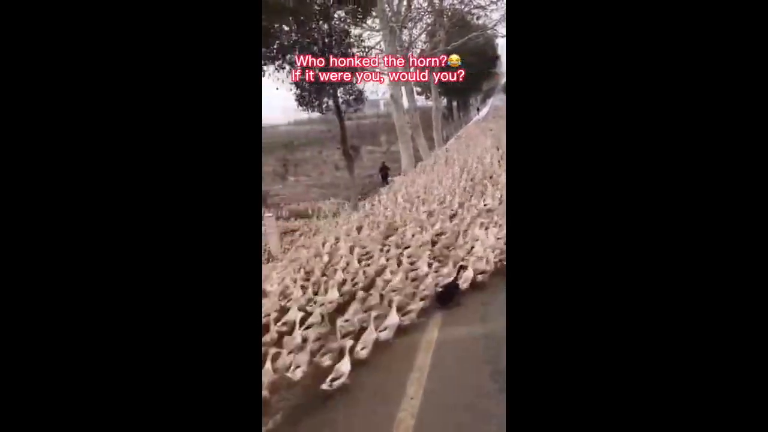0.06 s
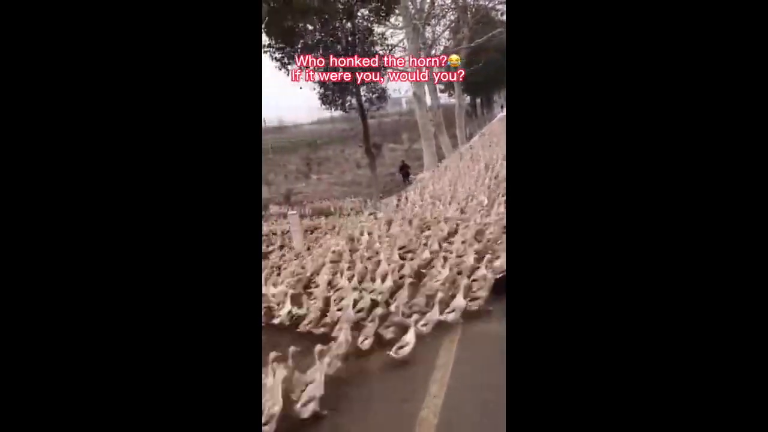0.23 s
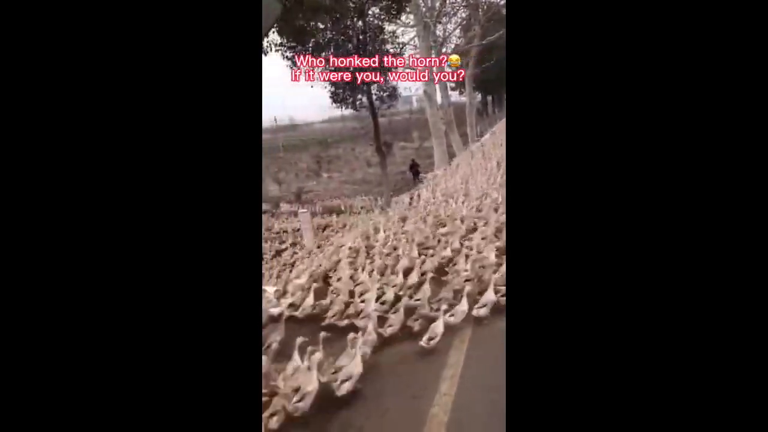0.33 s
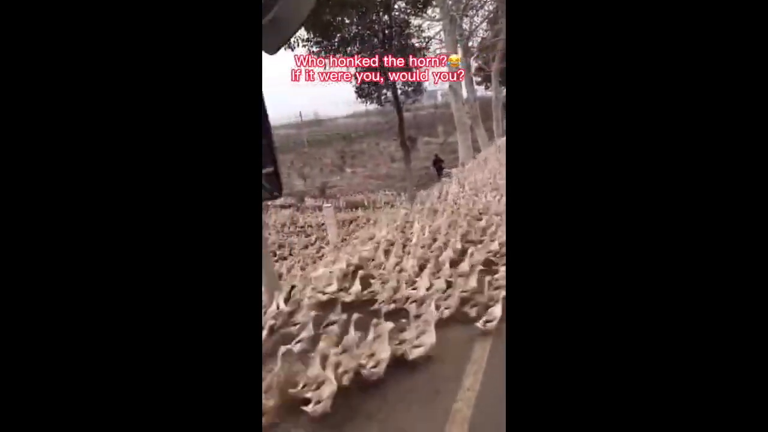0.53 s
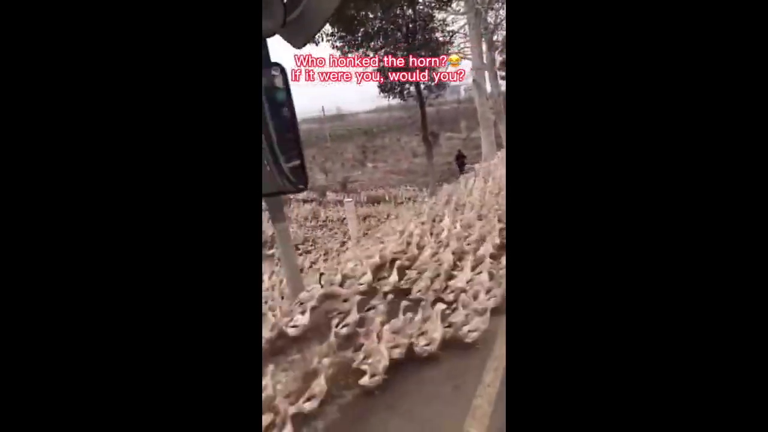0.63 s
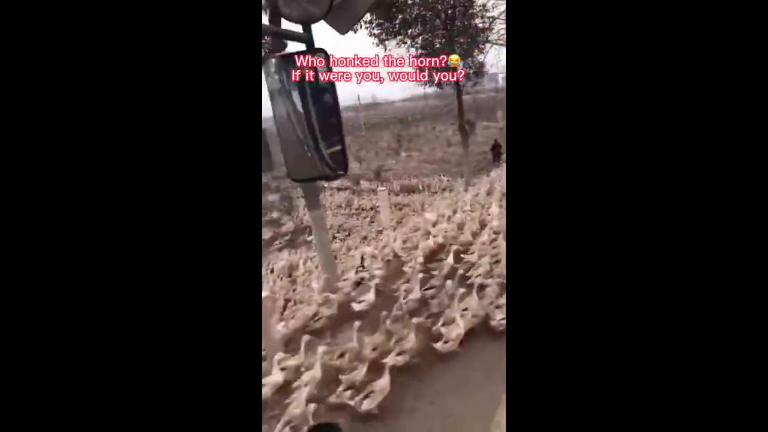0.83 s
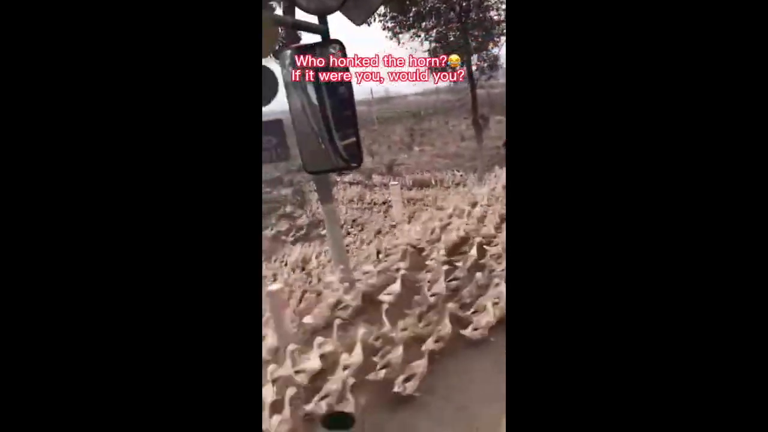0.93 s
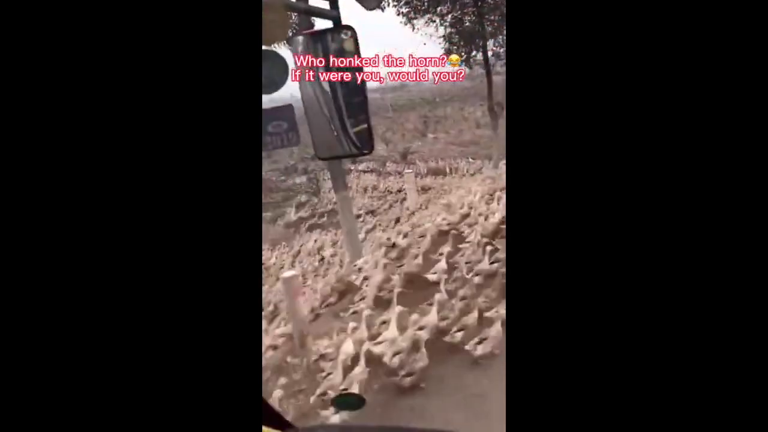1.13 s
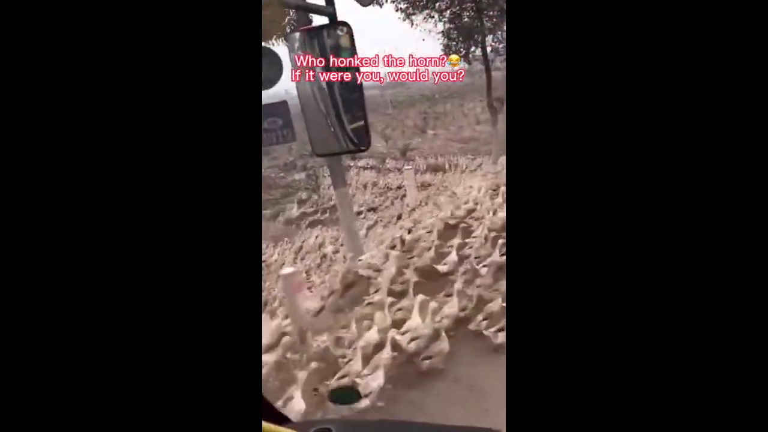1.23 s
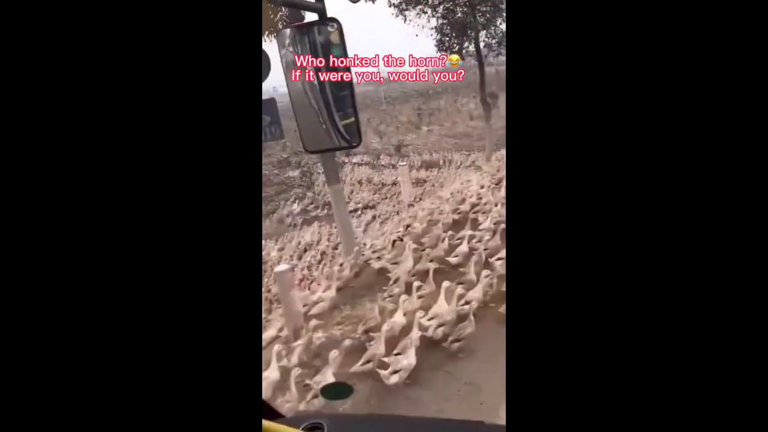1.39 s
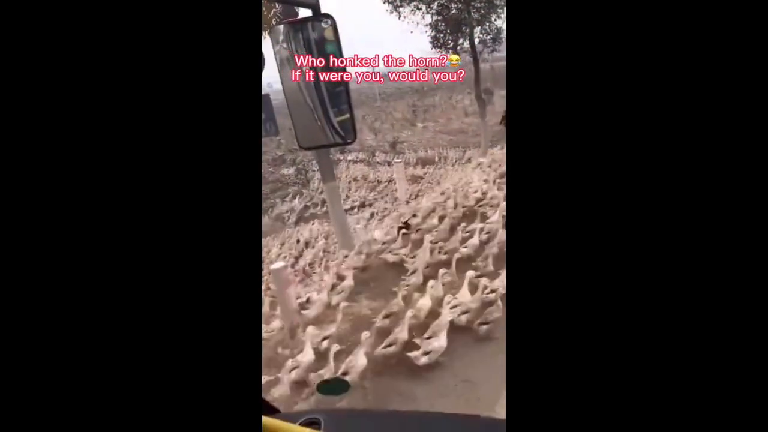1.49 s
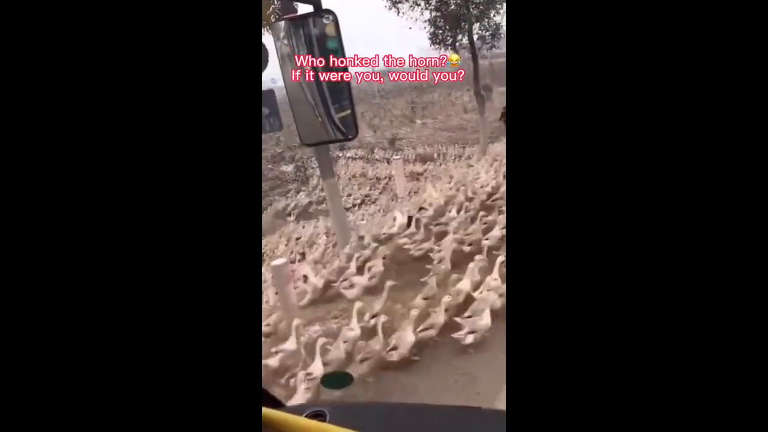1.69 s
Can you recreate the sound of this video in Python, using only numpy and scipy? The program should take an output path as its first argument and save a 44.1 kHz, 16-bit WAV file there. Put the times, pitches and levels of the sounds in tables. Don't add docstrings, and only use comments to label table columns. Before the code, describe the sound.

A two-tone electric vehicle horn honks once, loud and brassy, then echoes away outdoors for about a second. A faint idling engine and road wash continue beneath, cut by a brief dropout near the end.

```python
import sys
import numpy as np
from scipy import signal
from scipy.io import wavfile
from scipy.ndimage import uniform_filter1d

SR = 44100
rng = np.random.default_rng(int(sys.argv[2]) if len(sys.argv) > 2 else 0)


def decibels_to_gain(level_db):
    exponent = np.asarray(level_db, float) / 20
    return 10 ** exponent


def output_pcm(signal):
    pcm = np.clip(np.atleast_2d(signal).T, -1, 1) * 32767
    wavfile.write(sys.argv[1], SR, np.round(pcm).astype(np.int16))


N = 77175

# multiple, before_db, after_db (either side of the scene change)
ENGINE_ORDERS = [(1, 0, -17), (2, -13.5, 3), (3, -9, 1.5), (4, -11, -14)]
# freq_hz, density_db (per Hz)
RUMBLE_COLOUR = [(20, -11), (40, -5.5), (70, -1.5), (120, 0), (180, -8.5), (250, -15), (320, -8),
                 (400, -28)]
# time_s, level_db
RUMBLE_LEVEL = [
    (0, -63),
    (.2, -60),
    (.3, -60),
    (.7, -62.5),
    (.8, -56),
    (1.1, -55),
    (1.3, -53.5),
    (1.38, -60.5),
    (1.47, -66),
    (1.75, -57),
]
# freq_hz, density_db (per Hz)
ROAD_COLOUR = [(150, 0), (300, -3.5), (600, -8), (1800, -12.5), (2800, -21), (6300, -31), (7500, -46.5),
               (16000, -55)]
# time_s, level_db
ROAD_LEVEL = [
    (0, -69.5),
    (.2, -67.5),
    (.7, -65.5),
    (1.0, -63),
    (1.38, -64),
    (1.47, -60.5),
    (1.75, -59),
]
# time_s, peak_db, pitch_hz
TICKS = [
    (.030, -70, 7000),
    (.122, -68, 3200),
]
# start_s, stop_s, level_db, pitch_hz, width_hz,
# second_level_db, second_pitch_hz, second_width_hz
AIR_LEAK = (.008, .056, -80, 13300, 1800, -4, 7800, 2500)
# multiple, level_db
HIGH_HORN_ORDERS = [(1, -8.5), (2, 2.5), (3, -7.5), (4, -5), (5, -15.5), (6, -19.5), (7, -22), (8, -24),
                    (9, -28), (10, -38), (11, -35), (12, -41.5), (13, -51.5), (14, -50.5), (15, -54.5),
                    (16, -60), (17, -62), (18, -50.5), (19, -62.5), (20, -53.5), (21, -62.5), (22, -68),
                    (23, -72), (24, -60), (25, -57), (26, -68), (27, -62.5), (28, -71), (29, -69),
                    (30, -71.5)]
LOW_HORN_ORDERS = [(1, -15), (2, -2), (3, -12), (4, -0.5), (5, -7.5), (6, -13.5), (7, -21.5), (8, -21),
                   (9, -26), (10, -32), (11, -25), (12, -27), (13, -34), (14, -38.5), (15, -36.5),
                   (16, -54), (17, -39), (18, -45.5), (19, -56.5), (20, -50.5), (21, -51.5), (22, -51),
                   (23, -61), (24, -57.5), (25, -53.5), (26, -58), (27, -60), (28, -71), (29, -62),
                   (30, -59)]
# freq_hz, density_db (per Hz)
RATTLE_COLOUR = [(150, -16.5), (300, -1), (700, -5.5), (1200, 4), (2500, -10.5), (5500, -29.5), (7500, -38),
                 (15000, -50)]
# delay_s, spread_s, level_db
ECHOES = [(.022, 0.014, -6), (.06, .015, -9), (.105, .008, -10.5), (.14, .02, -15), (.22, .03, -10),
          (.29, .03, -17.5), (.36, 0.046, -15), (.43, 0.069, -13.5), (.5, 0.029, -11.5), (.6, 0.016, -15.5),
          (.72, 0.043, -17), (.84, 0.028, -32.5), (.95, 0.071, -21.5)]
# freq_hz, loss_db_per_s
PATH_LOSS = [(840, 8), (1000, 10), (1500, 2), (1700, 11), (2900, 25), (3450, 5), (4500, 24), (10000, 63)]
# freq_hz, level_db
THROWN_BACK = [(400, 3.5), (520, -10.5), (830, 2), (1000, -11), (1500, 1), (2300, -0.5), (4000, 4.5),
               (9000, 10)]

MUTE_START_S, MUTE_STOP_S, MUTE_FADE_S = 1.380, 1.469, 0.004


def evened(x):
    return x / np.sqrt(np.mean(x ** 2) + 1e-20)


def read(points, hz):
    f, value = np.transpose(points)
    return np.interp(np.log(hz + 1), np.log(f + 1), value)


def curve(points):
    return np.interp(np.arange(N) / SR, *np.transpose(points))


def noise(spectrum, patchy_db):
    a, b, patches = rng.standard_normal((N // 256 + 5, 513, 3)).T
    patches = uniform_filter1d(patches, size=8, axis=0)
    patches = evened(uniform_filter1d(patches, size=10, axis=1))
    colour_db = read(spectrum, np.fft.rfftfreq(1024, 1 / SR))[:, None]
    z = (a + 1j * b) * decibels_to_gain(colour_db + patchy_db * patches)
    return evened(signal.istft(z, nperseg=1024, noverlap=768)[1][:N])


def resonate(x, hz, width):
    turn = np.exp(2j * np.pi * hz * np.arange(len(x)) / SR)
    r = np.exp(-np.pi * width / SR)
    return 2 * (turn * signal.lfilter([1 - r], [1, -r], x / turn)).real


def traffic():
    after = np.arange(N) > np.mean((MUTE_START_S, MUTE_STOP_S)) * SR
    firing_hz = np.where(after, 28.2, 29.1)
    turns = np.cumsum(firing_hz) / SR
    orders = np.zeros(N)
    for k, before_db, after_db in ENGINE_ORDERS:
        level = decibels_to_gain(np.where(after, after_db, before_db)) * np.sqrt(2)
        orders += level * np.cos(2 * np.pi * (k * turns + rng.random()))
    throb = 1 + 0.2 * np.cos(2 * np.pi * turns)
    body = throb * noise(RUMBLE_COLOUR + [(600, -68.5)], patchy_db=0) + orders
    rumble = decibels_to_gain(curve(RUMBLE_LEVEL) - 2.5) * body
    road = decibels_to_gain(curve(ROAD_LEVEL)) * noise([(60, -28)] + ROAD_COLOUR, patchy_db=0)
    return rumble + road


def cab():
    t = np.arange(N) / SR
    ticks = np.zeros(N)
    for s, db, hz in TICKS:
        decay = (t > s) * np.exp(-np.maximum(t - s, 0) / 0.0015)
        burst = decay * rng.standard_normal(N)
        ticks += decibels_to_gain(db) * (0.34 * burst + 2 * resonate(burst, hz, 1500))
    start, stop, db, hz, width, db2, hz2, width2 = AIR_LEAK
    air = rng.standard_normal(N)
    first = evened(resonate(resonate(air, hz, width), hz, width))
    second = evened(resonate(resonate(air, hz2, width2), hz2, width2))
    puff = np.clip(np.minimum(t - start, stop - t) / 0.003, 0, 1)
    return ticks + decibels_to_gain(db) * (first + decibels_to_gain(db2) * second) * puff


def horn(orders, start_s, stop_s, pitch_hz, level_db):
    swing_up_s, ring_down_s = 0.0047, 0.0091
    t = np.arange(N) / SR
    on = np.maximum(t - start_s, 0)
    off = np.maximum(t - stop_s, 0)
    grow = 0.5 + 0.5 * np.tanh((t - start_s) / (2 * swing_up_s))
    die = 1 / np.cosh(np.minimum(off / ring_down_s, 99))

    waver = 0.0003 * evened(uniform_filter1d(rng.standard_normal(N), size=400))
    start_flat = 0.02 * np.exp(-on / 0.012)
    stop_flat = 0.013 * np.tanh(off / ring_down_s)
    turns = np.cumsum(pitch_hz * (1 - start_flat - stop_flat + waver)) / SR

    lines = []
    for (k, db), phase in zip(orders, rng.random(len(orders))):
        swell = grow ** (1 + 0.82 * k)
        lines.append(decibels_to_gain(db) * swell * np.cos(2 * np.pi * (k * turns + phase)))
    stack = sum(lines) + 1.9 * np.exp(-on / 0.019) * lines[0]

    halves = np.cos(np.pi * turns) + np.cos(3 * np.pi * turns)
    halves = decibels_to_gain(-23) * np.exp(-on / 0.03) * halves
    rattle_level = decibels_to_gain(-16) * np.exp(-on / 0.067) + decibels_to_gain(-54.5)
    rattle = rattle_level * noise(RATTLE_COLOUR, patchy_db=3)
    return decibels_to_gain(level_db) * np.sqrt(2) * die * (stack + grow * (grow * halves + rattle))


def roadside(x):
    spacing = 20
    at = np.arange(100, N - spacing, spacing)
    taps = np.zeros(N)
    taps[at + rng.integers(0, spacing, len(at))] = rng.choice([-1., 1.], len(at))
    t = np.arange(N) / SR
    power = np.zeros(N)
    for delay, spread, db in ECHOES:
        bunch = np.exp(-0.5 * ((t - delay) / spread) ** 2)
        power += decibels_to_gain(2 * db) * bunch / (spread * np.sqrt(2 * np.pi) * SR / spacing)
    f, frames, z = signal.stft(taps * np.sqrt(power), SR, nperseg=256)
    colour_db = read(THROWN_BACK, f)[:, None] - frames * read(PATH_LOSS, f)[:, None]
    tail = signal.istft(z * decibels_to_gain(colour_db), SR, nperseg=256)[1]
    return x + signal.fftconvolve(x, tail)[:N]


def scene():
    high = horn(HIGH_HORN_ORDERS, start_s=0.219, stop_s=0.512, pitch_hz=498.25, level_db=-24.5)
    low = horn(LOW_HORN_ORDERS, start_s=0.225, stop_s=0.516, pitch_hz=419.15, level_db=-27.5)
    before = np.clip((MUTE_START_S - np.arange(N) / SR) / MUTE_FADE_S + 3, 0, 1)
    return (roadside(high + low) * before + traffic() + cab())[None]


def band_limit(x):
    return signal.sosfilt(signal.butter(12, 15600, fs=SR, output="sos"), x)


def record(dry):
    t = np.arange(N) / SR
    outside = np.maximum(MUTE_START_S - t, t - MUTE_STOP_S)
    gate = np.clip(outside / MUTE_FADE_S + 1, decibels_to_gain(-30), 1)
    squeezed = dry - 0.12 * dry ** 3
    mix = squeezed * gate + decibels_to_gain(-88) * rng.standard_normal(N)
    return band_limit(mix)


dry = scene()
out = record(dry)
output_pcm(out)
```